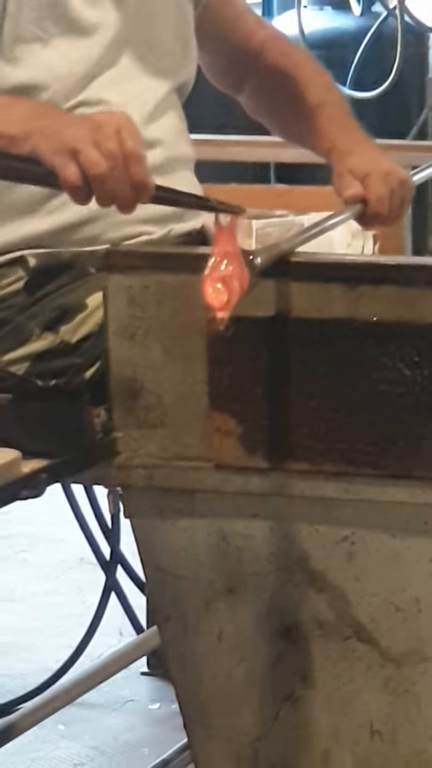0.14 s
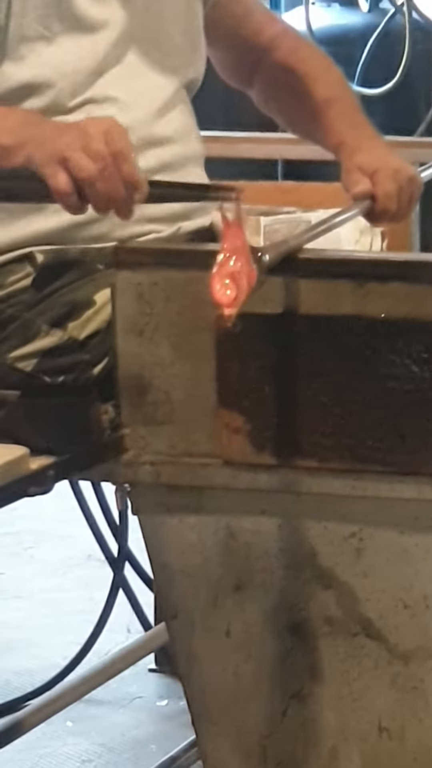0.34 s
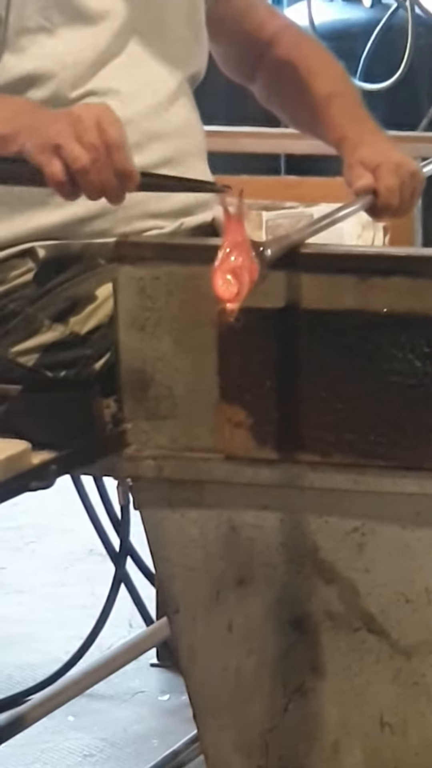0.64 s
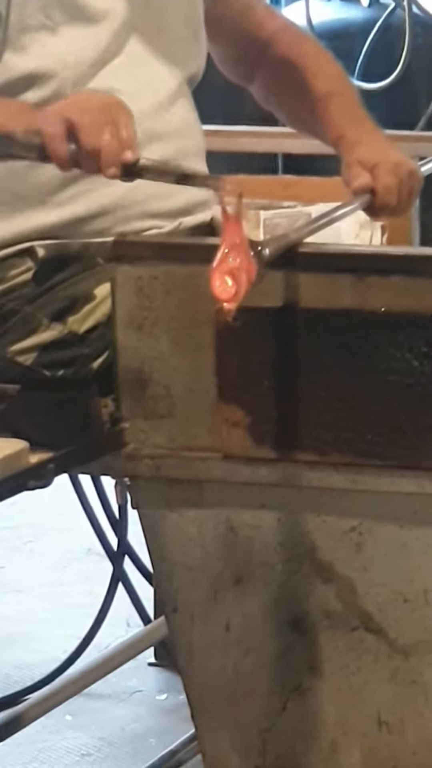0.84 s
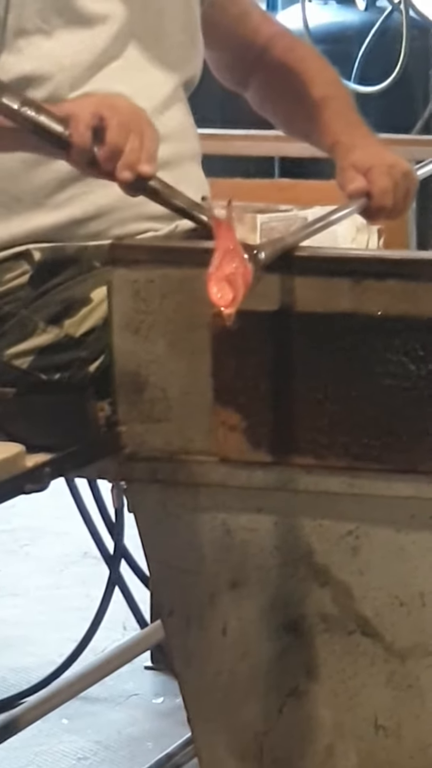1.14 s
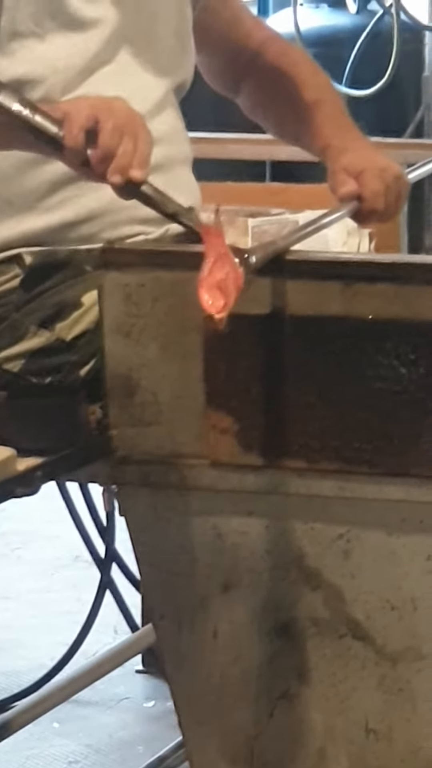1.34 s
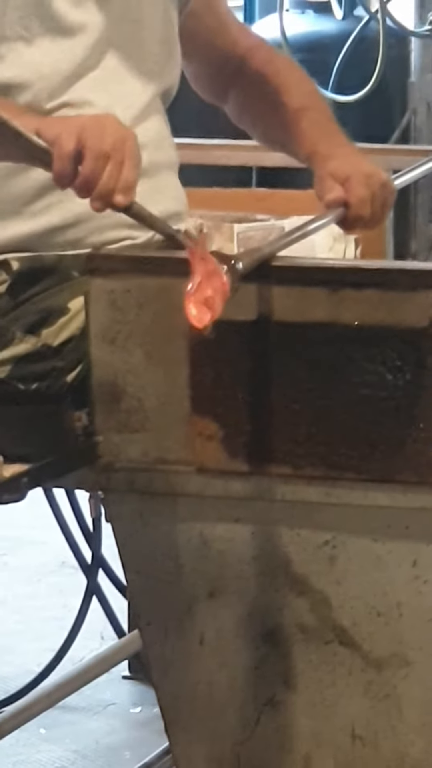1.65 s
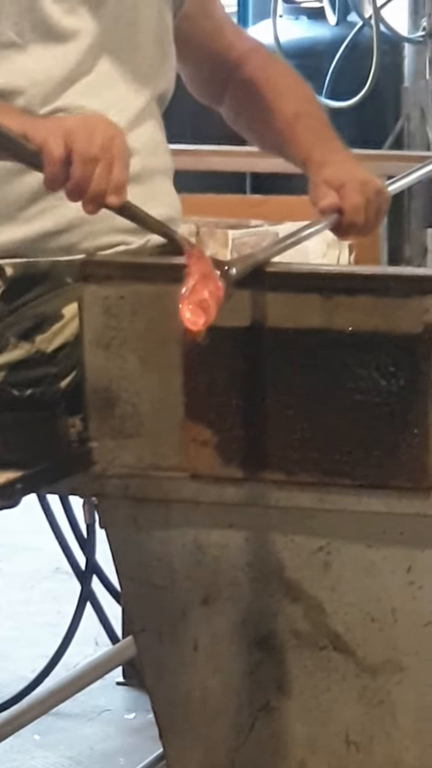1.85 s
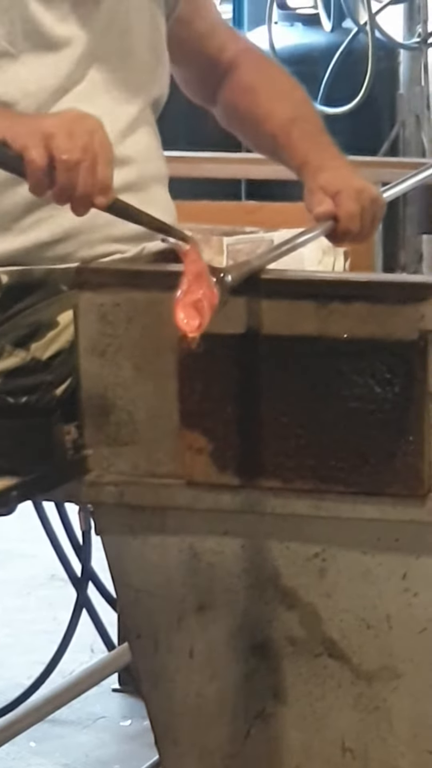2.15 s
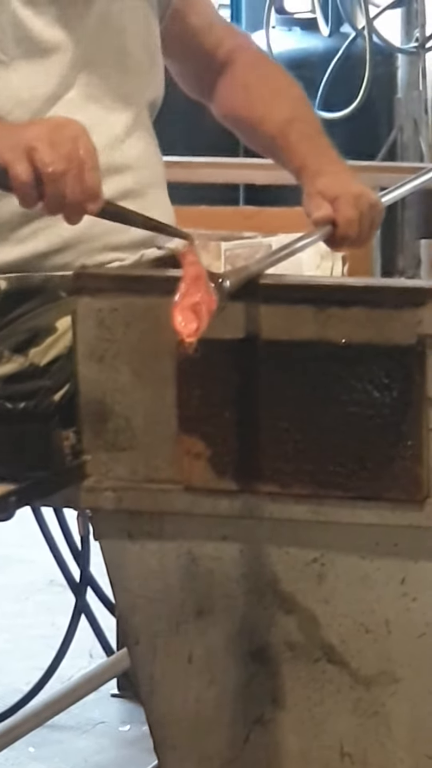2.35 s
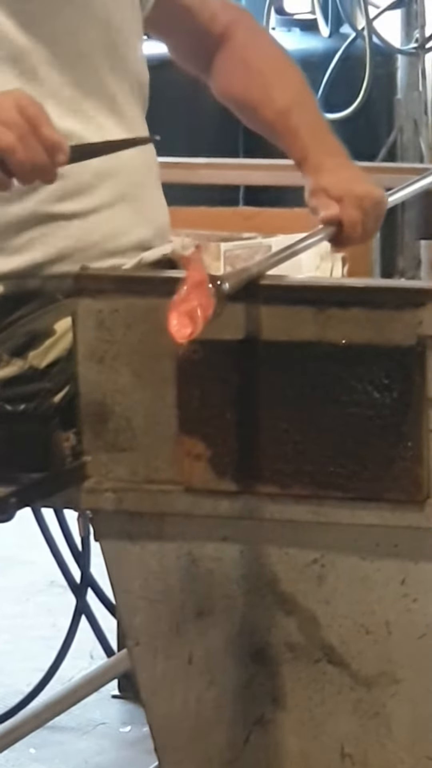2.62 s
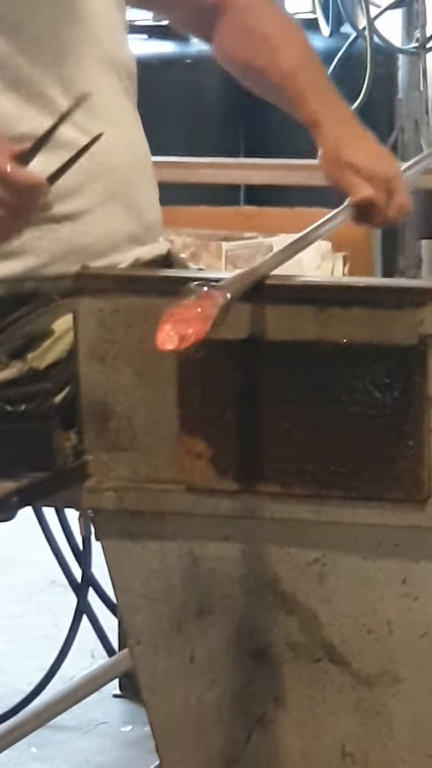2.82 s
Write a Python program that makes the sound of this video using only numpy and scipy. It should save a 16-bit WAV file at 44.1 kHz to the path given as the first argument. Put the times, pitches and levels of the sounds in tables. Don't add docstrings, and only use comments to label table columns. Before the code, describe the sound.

A gas furnace roars without pause from 0 to 3 seconds in a glass workshop. Its deep boom, strongest around 50 to 200 hertz, flutters in small irregular surges, fuller near 0.1, 0.45, 0.75 and 1.9 seconds. Beneath it are a quieter, hollow, pipe-coloured rush and a faint, steady, wide gas hiss. No tool clinks stand out. Handheld stereo pickup, bass nearly centred.

```python
import sys
import numpy as np
from scipy import signal
from scipy.fft import rfft, irfft, next_fast_len
from scipy.io import wavfile
from scipy.ndimage import uniform_filter1d, map_coordinates

SR = 44100
rng = np.random.default_rng(int(sys.argv[2]) if len(sys.argv) > 2 else 0)


def invert_db(x):
    u = np.asarray(x, float) / 20
    return 10 ** u


def output_pcm(signal):
    pcm = np.clip(np.atleast_2d(signal).T, -1, 1) * 32767
    wavfile.write(sys.argv[1], SR, np.round(pcm).astype(np.int16))


N = 131418


def unit(x):
    return x / np.sqrt(np.mean(x ** 2) + 1e-20)


def along(points, hz):
    f, v = np.transpose(points)
    return np.interp(np.log(hz + 1), np.log(f + 1), v)


def curve(times, values):
    return np.interp(np.arange(N) / SR, times, values)


def wobble(rate):
    knots = rng.standard_normal(int(N * rate / SR) + 4)
    return map_coordinates(knots, [np.arange(N) * rate / SR])


def filtered(x, response):
    m = next_fast_len(N + SR // 2)
    return irfft(rfft(x, m) * response(np.fft.rfftfreq(m, 1 / SR)), m)[..., :N]


def humps(hz, centre_hz, width_hz, db):
    bell = 1 / (1 + (2 * (hz[:, None] - centre_hz) / width_hz) ** 2)
    return invert_db(bell @ db)


# f/Hz, likeness (1 = the same)
LIKENESS = [(30, 1), (130, .97), (290, 0.95), (450, 0.59), (640, .5), (800, 0.52), (1150, -0.26),
            (2000, 0.31)]
# f/Hz, level/dB
LEFT_OVER_RIGHT = [(60, 2), (200, 1.2), (500, -0.5), (800, 1.6), (1800, 0), (2400, 6.5), (3000, -3.5)]


def pair(patchy_db):
    z = signal.stft(rng.standard_normal((2, N)), nperseg=512)[2]
    patches = uniform_filter1d(rng.standard_normal(z.shape[1:]), 6, axis=0)
    patches = uniform_filter1d(patches, 14, axis=1)
    two = signal.istft(z * invert_db(patchy_db * unit(patches)), nperseg=512)[1][:, :N]

    def shared_and_opposed(hz):
        angle = np.arccos(np.clip(along(LIKENESS, hz), -1, 1)) / 2
        return np.array([np.cos(angle), np.sin(angle)])

    def port_balance(hz):
        lag_s = -5e-5
        gain = invert_db(np.outer([.5, -.5], along(LEFT_OVER_RIGHT, hz)))
        return gain * np.exp(np.outer([-1j, 1j], np.pi * hz * lag_s))

    mid, side = filtered(two, shared_and_opposed)
    return filtered(np.array([mid + side, mid - side]), port_balance)


def held(x):
    window_s, share = 0.081, .5
    swell = np.abs(uniform_filter1d(x.mean(0) ** 2, int(window_s * SR))) + 1e-12
    return unit(x / swell ** (share / 2)) * np.sqrt(np.mean(x ** 2))


# t/s, level/dB, lean to the upper chamber notes/dB
SURGES = [(0.0, -30, 16), (0.04, -25.5, -4), (0.1, -19, -0.5), (0.16, -33, -2), (0.17, -24, 1.5),
          (0.37, -29, 2), (0.46, -23, -1.5), (0.51, -28, 1), (0.55, -24.5, 1.5), (0.72, -29.5, -1.5),
          (0.75, -22.5, 0.5), (0.82, -27.5, 1.5), (1.2, -28, 1), (1.86, -26, 1), (1.89, -23.5, -1.5),
          (2.06, -26, -0.5), (2.85, -26.5, 0.5), (2.98, -30, -0.5)]
# f/Hz, level/dB (per Hz)
BOOM_COLOUR = [(13, -49), (22, -45), (42, -11), (76, -6), (124, 0.5), (179, -0.5), (253, -15), (324, -16.5),
               (420, -25.5), (550, -100), (920, -120)]
# f/Hz, width/Hz, level/dB over the boom (negative = a dip)
BOOM_NOTES = [(53.6, 12.6, 12), (96, 11.5, 5.5), (107.7, 8.5, -9), (124.7, 13.7, 9), (149.6, 11, -7),
              (152, 11, 2), (171.6, 28, 4), (224, 34, 5), (272.3, 13.6, -11.5), (286.7, 23, 8.5),
              (312.4, 11.5, -7), (324.8, 18, 7.5), (369, 14, 4.5)]


def flame():
    split_hz, surge_s = 148, .08
    chamber = lambda hz: invert_db(along(BOOM_COLOUR, hz)) * humps(hz, *np.transpose(BOOM_NOTES))
    boom = filtered(pair(patchy_db=0.85), chamber)
    lower = filtered(boom, lambda hz: 1 / (1 + (hz / split_hz) ** 16))
    upper = boom - lower
    times, level, lean = np.transpose(SURGES)
    level_db = uniform_filter1d(curve(times, level), int(surge_s * SR))
    lean_db = uniform_filter1d(curve(times, lean), int(surge_s * SR))
    return invert_db(level_db) * unit(invert_db(-lean_db) * held(lower) + invert_db(lean_db) * held(upper))


# f/Hz, level/dB (per Hz)
RUSH_COLOUR = [(150, -46), (250, -4), (323, -5), (556, -7), (808, -5), (1010, -12), (1100, -11.5),
               (1630, -11.5), (3200, -21), (4160, -34), (7040, -120)]
# f/Hz, width/Hz, level/dB over the rush at the left port, level/dB at the right port
PIPE_NOTES = [(473, 18, 4.5, 5), (585, 11, -3, -5), (596, 28, 5, 8), (750, 32, 0.5, 3.5), (818.5, 30, 8, 3),
              (913, 31, 4, 4.5), (1087, 25, 8, 9.5), (1122, 36, 5.5, 2), (1250, 73, 7, 6), (1388, 37, 8, 0),
              (1538, 39, 8, 3), (2000, 83, 3.5, -2.5), (2360, 19.5, 0, 17.5), (1600, 68, -7, -9)]


def flue():
    centre, width, left, right = np.transpose(PIPE_NOTES)

    def pipe(hz):
        ringing = [humps(hz, centre, width, left), humps(hz, centre, width, right)]
        return invert_db(along(RUSH_COLOUR, hz)) * ringing

    unsteady_db = .2 * wobble(3) + .2 * wobble(9)
    rush = invert_db(unsteady_db) * pair(patchy_db=.3)
    return invert_db(-38) * unit(filtered(rush, pipe))


# t/s, level/dB of the jet
GAS_FLOW = [
    (0.0, -43.5),
    (0.02, -45.5),
    (0.31, -46),
    (2.98, -45.5),
]
# f/Hz, level/dB (per Hz)
HISS_LEFT = [(2400, -7), (3200, -5.5), (4600, -2), (5700, -9.5), (6500, -8), (7500, -16), (11800, -4),
             (15700, -26.5)]
HISS_RIGHT = [(2400, -13), (4000, -3.5), (5700, -1), (7100, 4.5), (7700, -7), (8800, -15), (12100, -1),
              (13200, -7.5)]
# f/Hz, level/dB
TREBLE_LEFT = [(8000, -0.5), (9500, -4), (10600, -2), (13000, -1.5), (14500, -1), (15500, -3)]
TREBLE_RIGHT = [(9500, 0.5), (10600, -4), (11000, 3), (12700, 4), (13300, 0), (14300, -6), (15000, -6),
                (15500, -4.5)]
# f/Hz, share (0 to 1)
FIXED_SHARE = [(2500, .2), (5000, .3), (7000, .6), (9000, .5), (12000, .85), (15000, .55)]
# delay/ms, level/dB
WAYS_LEFT = [(0.079, -9), (1.17, 24), (9.75, -7), (1.9, -22)]
WAYS_RIGHT = [(-0.5, -15), (2.85, 10.5), (3.5, -9), (7.5, -16), (12.5, -10), (9, 1)]


def echoes(ways, hz):
    return sum(invert_db(db) * np.exp(-2j * np.pi * hz * ms / 1000) for ms, db in ways)


def jet():
    t60_s, room_db = .25, -4
    t = np.arange(SR // 3) / SR
    tails = invert_db(-60 * t / t60_s) * rng.standard_normal((2, len(t))) * (t > .004)
    nozzle = rng.standard_normal(N + len(t))
    diffuse = rng.standard_normal((2, N))
    late = unit(signal.fftconvolve(nozzle[None], tails, axes=1)[:, len(t):len(t) + N])
    early = unit(filtered(nozzle[len(t):], lambda hz: [echoes(WAYS_LEFT, hz), echoes(WAYS_RIGHT, hz)]))
    fixed = unit(early + invert_db(room_db) * late)
    share = lambda hz: np.clip(along(FIXED_SHARE, hz), 0, 1)
    mix = filtered(fixed, lambda hz: np.sqrt(share(hz)))
    mix = mix + filtered(diffuse, lambda hz: np.sqrt(1 - share(hz)))

    def ports(hz):
        low_edge = 1 / (1 + (2400 / (hz + 1)) ** 6)
        left_db = along(HISS_LEFT, hz) + along(TREBLE_LEFT, hz)
        right_db = along(HISS_RIGHT, hz) + along(TREBLE_RIGHT, hz)
        return low_edge * invert_db([left_db, right_db]) * (hz < 16000)

    flutter_db = .2 * wobble(8)
    level_db = curve(*np.transpose(GAS_FLOW)) + 3 + flutter_db
    return invert_db(level_db) * unit(filtered(mix, ports))


def scene():
    return flame() + flue() + jet()


# f/Hz, width/Hz, level/dB
BODY_NOTES = [(2100, 150, 2), (2540, 170, 2), (2960, 180, -3)]


def casing(x):
    return filtered(x, lambda hz: humps(hz, *np.transpose(BODY_NOTES)))


def top_cut(x):
    return signal.sosfilt(signal.butter(12, 15640, fs=SR, output="sos"), x)


def record(dry):
    picked_up = casing(dry)
    return top_cut(picked_up)


dry = scene()
out = record(dry)
output_pcm(out)
```